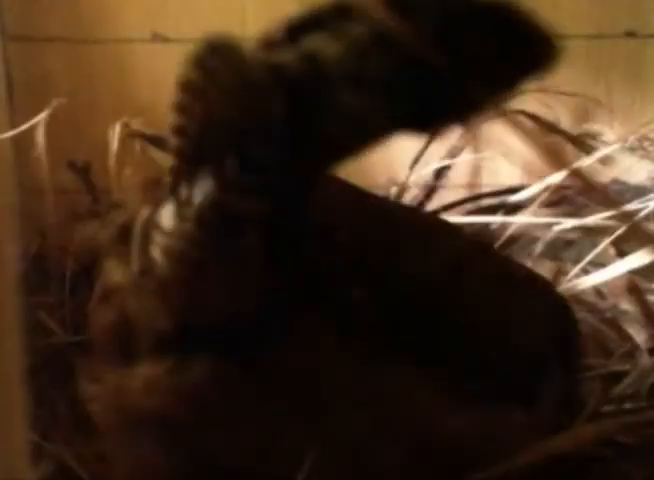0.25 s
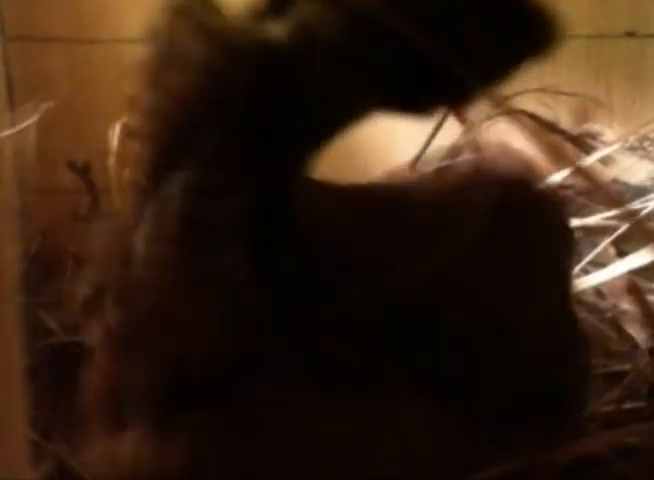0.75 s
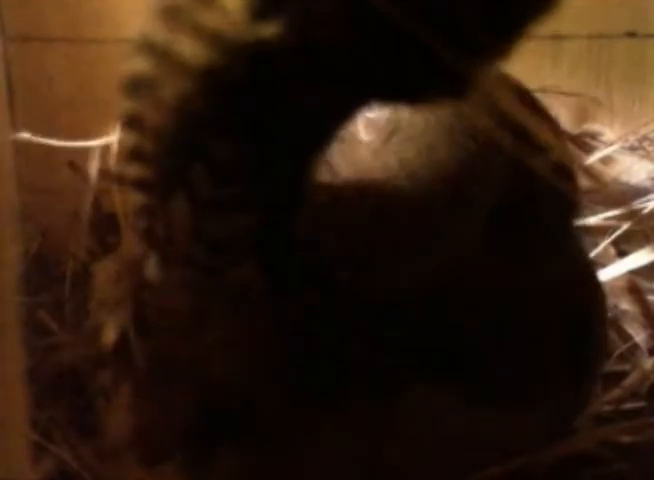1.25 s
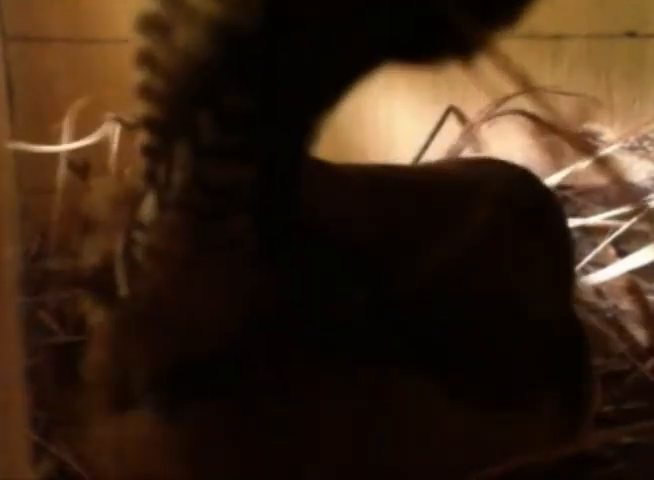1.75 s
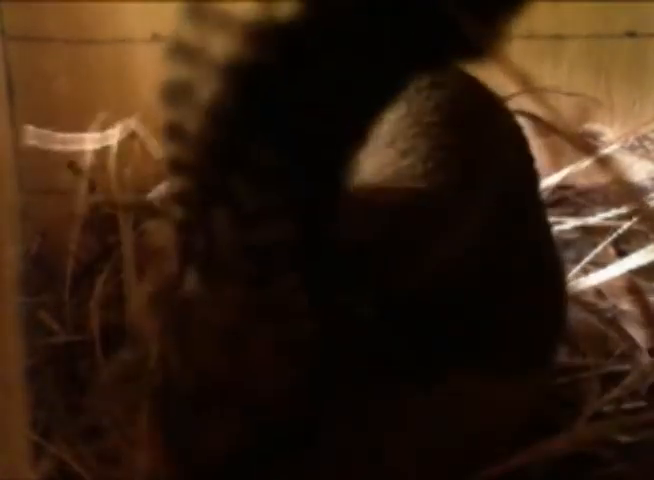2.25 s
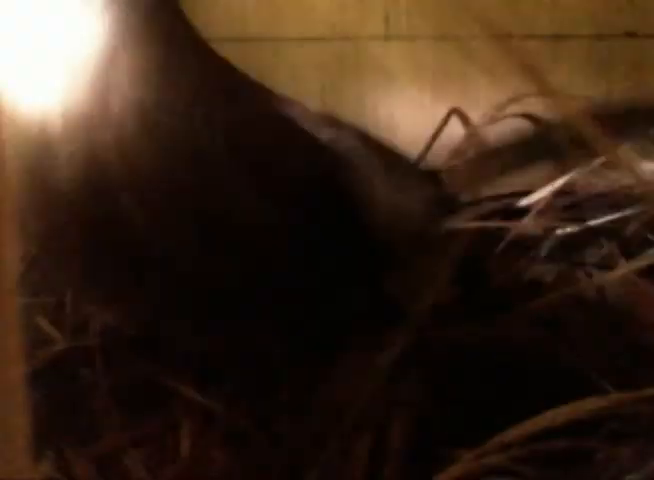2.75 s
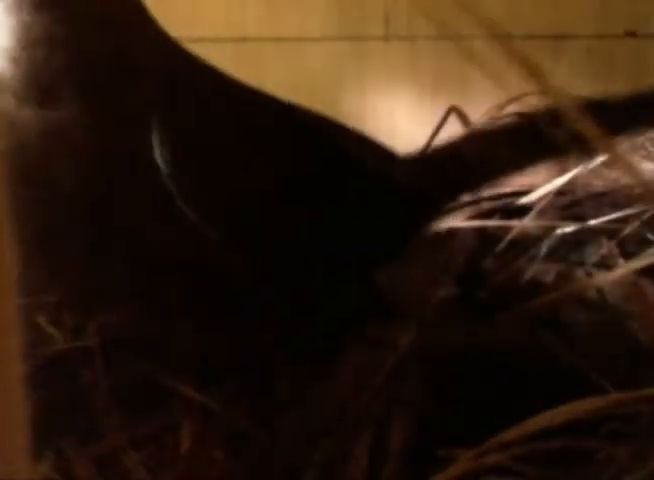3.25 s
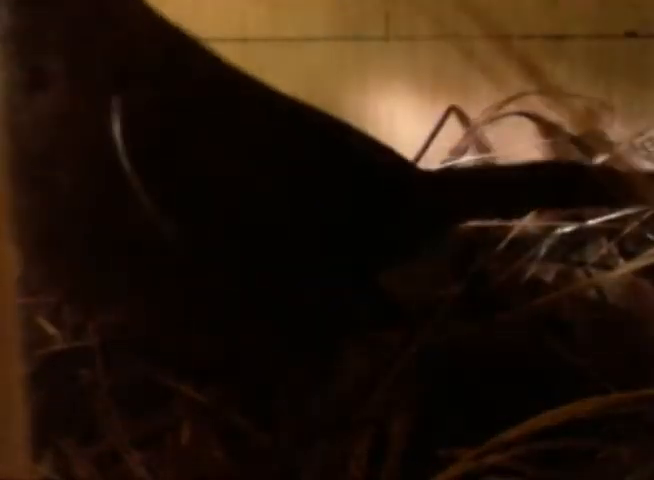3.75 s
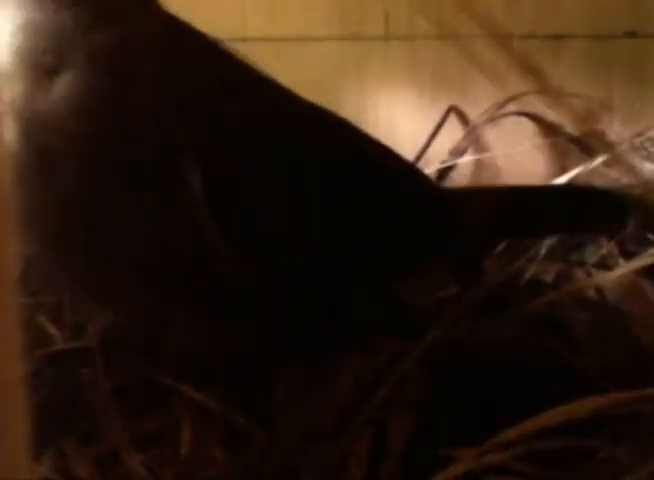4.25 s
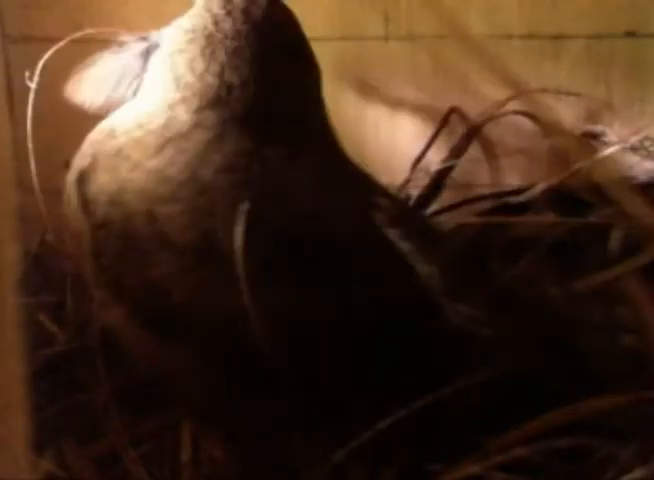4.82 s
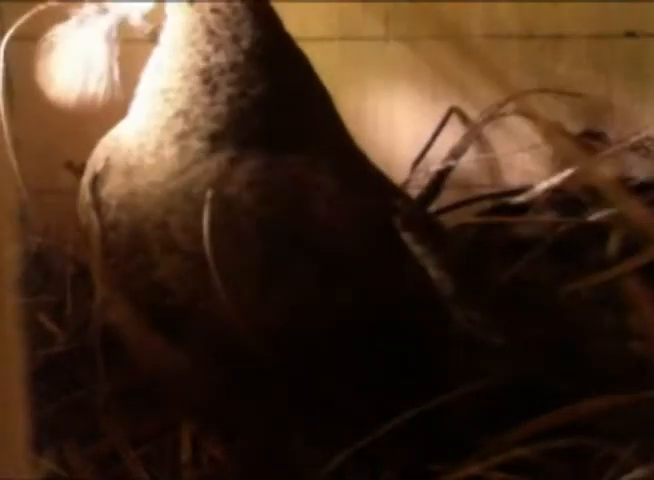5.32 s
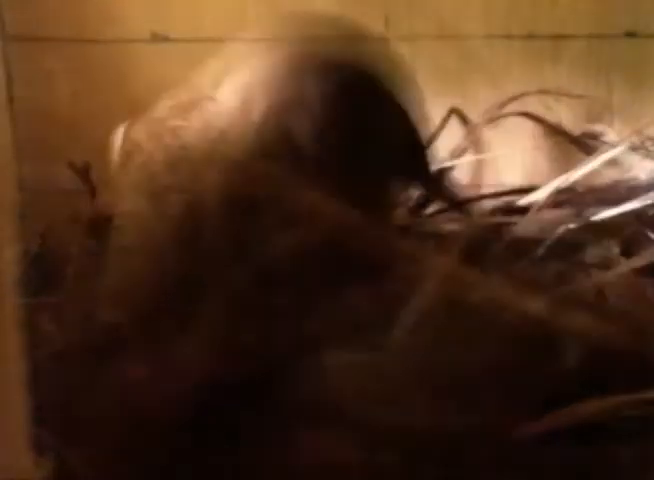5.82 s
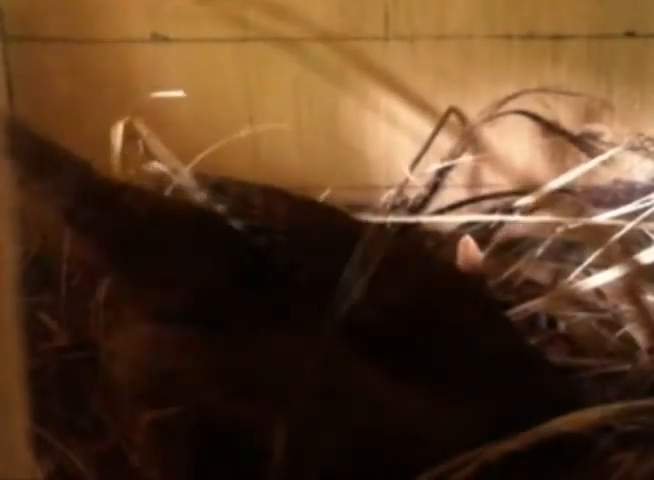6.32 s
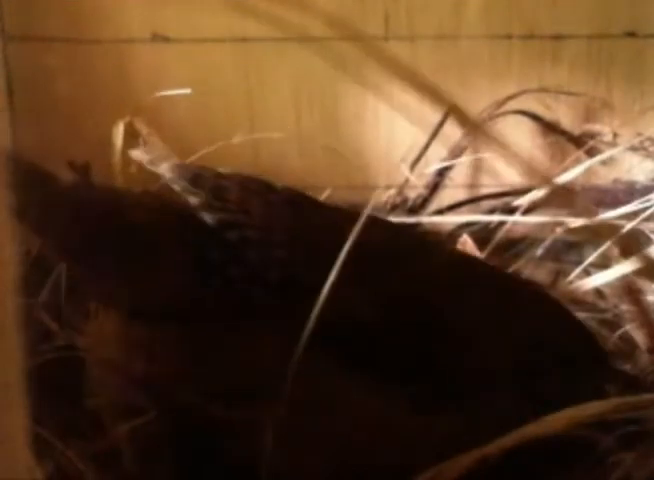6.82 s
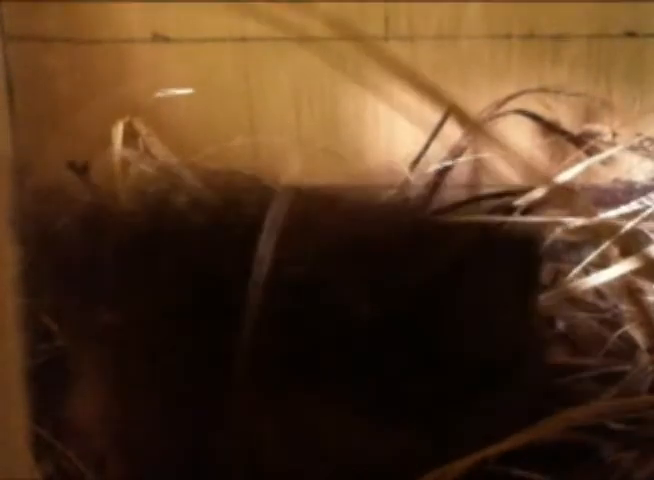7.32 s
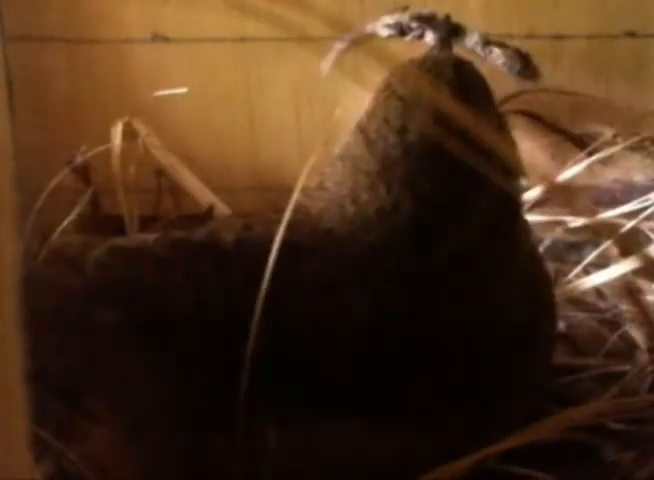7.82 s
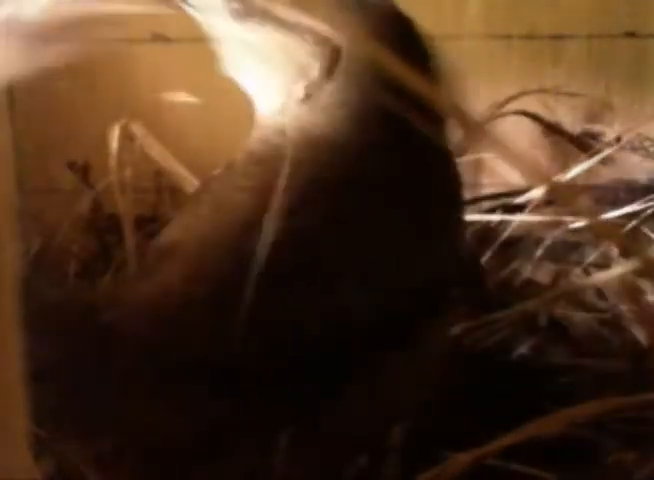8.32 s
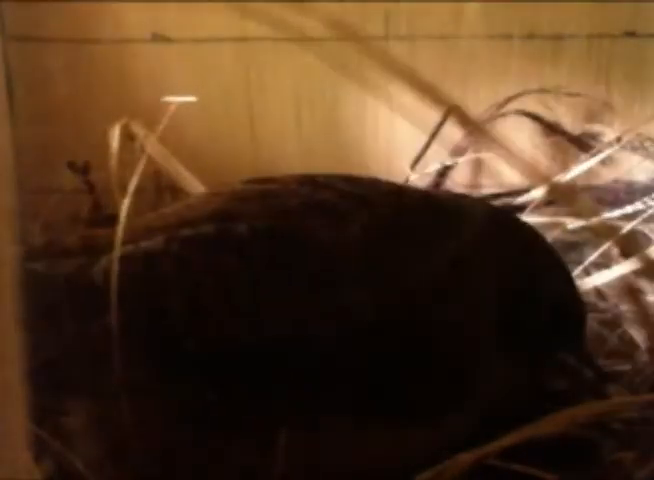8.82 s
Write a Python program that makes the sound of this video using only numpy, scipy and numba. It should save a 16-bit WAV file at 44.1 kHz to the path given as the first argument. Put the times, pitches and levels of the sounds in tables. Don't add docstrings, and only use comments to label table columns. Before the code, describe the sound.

Inside a wooden nest box, a bird shuffles in dry straw right beside the microphone, with crisp crackles and dull foot knocks mostly in the first second. Outside, a small bird bursts into a fast whistled phrase with a trill at about two seconds, and again after seven. Faint chips and distant birds fill the gaps, over constant hiss and low rumble.

```python
import sys
import numpy as np
from scipy import signal
from scipy.fft import rfft, irfft
from scipy.io import wavfile
from scipy.ndimage import uniform_filter1d
from numba import njit

SR = 44100
rng = np.random.default_rng(int(sys.argv[2]) if len(sys.argv) > 2 else 0)


def to_linear_factor(level_db):
    exponent = np.asarray(level_db, float) / 20
    return 10 ** exponent


def materialize(psi):
    bounded = np.clip(np.atleast_2d(psi).T, -1, 1)
    quanta = np.round(bounded * 32767).astype(np.int16)
    wavfile.write(sys.argv[1], SR, quanta)


N = 399987

# (pitch [Hz], width [Hz], level [dB])
BOX_MODES = [(289, 73, -3.5), (495, 121, -0.5), (834, 250, -11), (1262, 53, 8), (1710, 150, -5),
             (2295, 150, 0.5), (2730, 100, 1), (3230, 65, -0.5), (3860, 220, -3), (4550, 2900, -20),
             (6500, 530, -4), (10300, 1900, -16)]


@njit
def svf(x, hz, width_hz):
    y, b, l = np.empty(len(x)), 0., 0.
    g, k = np.tan(np.pi * hz / SR), width_hz / hz
    for i in range(len(x)):
        v = (b + g * (x[i] - l)) / (1 + g * (g + k))
        b, l, y[i] = 2 * v - b, l + 2 * g * v, k * v
    return y


def modes(x, table):
    return sum((-1) ** k * to_linear_factor(db) * svf(x, 1. * hz, 1. * w) for k, (hz, w, db) in enumerate(table))


def unit(x):
    return x / np.sqrt(np.mean(x ** 2))


def add(out, s, piece):
    i = int(s * SR)
    out[i:i + len(piece)] += piece[:N - i]


def walk(rate_hz):
    k = int(SR / rate_hz)
    steps = np.repeat(rng.standard_normal(N // k + 1), k)
    return unit(uniform_filter1d(uniform_filter1d(steps, k), k)[:N])


def sweep(hz):
    return 2 * np.pi * np.cumsum(hz) / SR


def preamp():
    # (frequency [Hz], density [dB per Hz])
    hiss_curve = [(15, -20), (33, -22), (158, -27), (400, -34.5), (1500, -43), (8000, -49), (12000, -47),
                  (15700, -43.5)]
    # (pitch [Hz], level [dB])
    whines = [(8640, -67), (13119, -79)]
    level_db = -47.5
    f = np.maximum(np.fft.rfftfreq(N, 1 / SR), 1)
    hz, db = np.transpose(hiss_curve)
    shape = to_linear_factor(np.interp(np.log(f), np.log(hz), db))
    band = np.sqrt(np.sum(shape[(f > 700) & (f < 15000)] ** 2) / np.sum(shape ** 2))
    out = unit(irfft(rfft(rng.standard_normal(N)) * shape, N)) * to_linear_factor(level_db) / band
    t = np.arange(N) / SR
    for hz, db in whines:
        out += to_linear_factor(db) * np.sqrt(2) * np.sin(2 * np.pi * hz * t)
    return out


def rumble():
    # (time [s], level [dB], extra on the lower mode [dB])
    course = [(0, -53.5, 1), (2.0, -52, -2), (3.3, -49.5, -1.5), (4.1, -47.5, -3), (4.7, -46, -4),
              (5.6, -50, -0.5), (6.3, -50, 3.5), (7.0, -53, 3.5), (7.7, -49.5, -1), (8.8, -49.5, -0.5),
              (9.07, -48, -2)]
    # (pitch [Hz], width [Hz], level [dB])
    low_modes = [(281, 40, 0), (479, 40, -4)]
    s, db, low_db = np.transpose(course)
    t, air = np.arange(N) / SR, rng.standard_normal(N)
    lower, upper = modes(air, low_modes[:1]), modes(air, low_modes[1:])
    hum = (lower * to_linear_factor(np.interp(t, s, low_db)) - upper) / np.std(lower - upper)
    return hum * to_linear_factor(np.interp(t, s, db) + 2 * walk(3.94))


def knocks():
    # (time [s], peak [dB], pitch [Hz])
    blows = [(0.022, -20.5, 259), (0.073, -24, 225), (0.146, -26.5, 267), (0.468, -23, 487),
             (0.55, -17.5, 482), (1.072, -25, 495), (3.999, -28.5, 380), (4.284, -32, 473),
             (5.903, -30, 500), (5.995, -37, 476), (6.076, -28, 273), (0.547, -25.5, 197),
             (0.611, -29, 490), (1.143, -35, 484), (5.912, -34, 200), (5.942, -28, 400), (0.351, -37, 313)]
    out, t = np.zeros(N), np.arange(2048) / SR
    for s, db, hz in blows:
        swell = (1 - np.exp(-t / 0.0009)) * np.exp(-t / 0.008)
        add(out, s - .002, to_linear_factor(db - 1.0) * np.sin(2 * np.pi * hz * t) * swell)
    return out


def close_up(x):
    return to_linear_factor(7.5) * svf(svf(x, 11700.0, 9300.0), 8900.0, 16000.0)


def shuffling():
    # (time [s], held [s], straw hiss [dB], wood rumble [dB])
    bouts = [(0.033, 0.12, -67, -45.5), (.35, 0.017, -54, -44), (0.55, 0.036, -51.5, -38.5),
             (.94, 0.028, -56, -45.5), (1.0599, 0.05, -49.5, -41.5), (3.99, .02, -52.5, -48),
             (5.92, 0.17, -51.5, -41), (.2, .2, -61, -50.5), (.16, 0.056, -60, -50),
             (0.471, 0.0077, -57, -51)]
    swell_db_per_s, fade_db_per_s = 224, 190
    straw, wood = np.zeros((2, N))
    for s, held_s, hiss_db, wood_db in bouts:
        t = np.arange(max(s - .12, 0), s + held_s + .1, 1 / SR)
        before_s, after_s = np.maximum(s - t, 0), np.maximum(t - s - held_s, 0)
        effort = to_linear_factor(-swell_db_per_s * before_s - fade_db_per_s * after_s)
        n = len(t)
        grains = to_linear_factor(3 * walk(90)[:n]) * (rng.random(n) < .3) * rng.standard_normal(n)
        add(straw, t[0], unit(grains) * to_linear_factor(hiss_db) * effort)
        add(wood, t[0], rng.standard_normal(n) * to_linear_factor(wood_db + 2.5 * walk(110)[:n]) * effort)
    scrape = to_linear_factor(10.5) * svf(straw, 3600.0, 7400.0)
    return close_up(straw) + scrape + to_linear_factor(21.0) * modes(wood, BOX_MODES[:2])


def straw_cracks():
    # (time [s], peak [dB], share heard through the box [dB], length [ms])
    snaps = [(0.072, -21, -7, 4.5), (0.083, -28.5, -7.5, 4.4), (0.091, -41, 8, 4), (0.111, -22, -15.5, 5.1),
             (0.122, -35, -11, 4.3), (0.1515, -24.5, -6, 2.3), (.158, -44, 5, 6.1), (0.18, -35, 1.5, 3.1),
             (0.233, -34.5, -5.5, 4.7), (0.318, -29.5, -3.5, 7.6), (0.328, -43, 8, 15), (0.343, -47, 0, 5),
             (0.364, -34.5, 2, 8.6), (0.381, -41, 4, 7.4), (0.463, -36, 6.5, 8.5), (0.476, -47, 5, 6),
             (.556, -38, -3, 5.7), (0.139, -45, 3, 8.8), (.337, -44.5, 7, 10), (0.531, -27.5, -8.5, 9.9),
             (.545, -27, -10.5, 9.4), (0.574, -30, -17, 3.9), (0.949, -35, -7, 4.2),
             (1.062, -28.5, -18, 6.4), (1.102, -36, -11, 11), (1.141, -36, -12, 4),
             (1.702, -34.5, -11, 3.8), (0.287, -51, 4, 9), (.197, -46, 2, 4.4), (0.395, -46, 3, 5),
             (2.034, -37, -19, 5.5), (3.282, -32, -17, 2.2), (3.7763, -35, -26, 3), (3.977, -40, -13, 14),
             (5.8948, -27.5, -12, 4.2), (5.939, -36, -8, 4), (5.995, -32, -8, 4.2), (6.003, -31, -19, 4.7),
             (6.04, -40, -13, 11), (6.118, -41, -19, 3), (6.062, -34, -16, 8.9)]
    colour_db = 2.5
    bright, boxed = np.zeros((2, N))
    t = np.arange(2048) / SR
    for s, db, box_db, ms in snaps:
        ragged = np.repeat(to_linear_factor(1.3 * rng.standard_normal(64)), 32) * 0.65
        swell = np.exp(-(t / (ms / 800)) ** 2) * np.clip(t / (0.88 * ms / 1e3), 0, 1)
        direct, inside = rng.standard_normal((2, 2048)) * ragged * swell
        add(bright, s - .001, to_linear_factor(db) * direct)
        chance = rng.standard_normal(len(BOX_MODES))
        coloured = [(hz, w, g + colour_db * c) for (hz, w, g), c in zip(BOX_MODES[1:], chance)]
        ring = modes(inside, coloured) + to_linear_factor(-14.5) * svf(inside, 2200.0, 3000.0)
        add(boxed, s - .001, to_linear_factor(db + box_db) * ring)
    return close_up(bright) + to_linear_factor(17.5) * boxed


def strokes():
    # (time [s], length [ms], start [Hz], end [Hz], level [dB])
    strays = [(0.503, 19, 2800, 2800, -49), (0.658, 11, 5900, 7240, -44), (.628, 45, 2790, 2800, -53.5),
              (1.933, 8, 2530, 2370, -44), (1.081, 17, 3730, 3540, -49), (1.166, 20, 4180, 4450, -47),
              (1.192, 20, 3880, 3500, -45), (1.2, 25, 4920, 4900, -51), (1.228, 12, 5700, 6000, -54),
              (1.291, 12, 2400, 2560, -47), (1.509, 32, 2580, 2360, -50), (1.792, 8.4, 3880, 3600, -44),
              (1.799, 9.8, 4200, 4960, -47), (1.812, 9, 6090, 6150, -44), (4.77, 56, 2770, 2820, -50),
              (6.463, 21, 4560, 4300, -50), (6.482, 28, 4000, 3520, -47.5), (6.548, 35, 4450, 4360, -52),
              (7.162, 11, 3720, 6120, -37.5), (7.164, 18, 3700, 3500, -48), (7.181, 25, 3540, 4450, -45.5),
              (7.174, 12, 6860, 7100, -49), (7.186, 13, 7100, 8400, -45), (7.744, 26, 5870, 5970, -41.5),
              (7.931, 25, 5800, 6000, -43), (8.311, 16, 6100, 5700, -44)]
    # (delay from its start [ms], length [ms], level [dB])
    flick = [(4.5, 11.6, -43.5), (-63, 33.4, -40), (14, 7.8, -34), (13, 5, -38), (55.5, 22.7, -34)]
    spike = [(32.6, 38, -47.5), (3, 5.5, -43), (13.8, 12, -32), (21.5, 5, -37), (40, 42, -42),
             (92.5, 3.5, -43), (97.6, 8, -40.5), (110, 11, -42)]
    peak = [(8, 47, -41), (0.91, 10.7, -30)]
    fall = [(1.544, 30, -25), (39.5, 10.2, -34.5), (0, 1.8, -38.5)]
    hook = [(-0.5, 11.8, -36.5), (9, 15.9, -32)]
    murmur = [(0, 17, -46), (36.1, 11, -38.5)]
    drop = [(-0.5, 7.9, -32.5), (7.5, 18, -33.5)]
    leap = [(0, 10, -39), (14.36, 20, -29.5), (21.84, 24, -39.5)]
    close = [(21, 15, -42), (0, 21, -36), (33.1, 13, -34.5), (43, 6.2, -40.5)]
    # (start [Hz], middle [Hz], end [Hz])
    flick_hz = [(5050, 5300, 5100), (3050, 2950, 2650), (5150, 4700, 3600), (6900, 6400, 5700),
                (2650, 3650, 3760)]
    spike_hz = [(2800, 2800, 2820), (4500, 4850, 5000), (6950, 6200, 6120), (5300, 4900, 4150),
                (5950, 5660, 5560), (4750, 4600, 4350), (4150, 4000, 3700), (3200, 2750, 2400)]
    peak_hz = [(6900, 7900, 7850), (6950, 6250, 6900)]
    fall_hz = [(4700, 3950, 3480), (4850, 4000, 3600), (4300, 4560, 4720)]
    hook_hz = [(2950, 3180, 3200), (3200, 2900, 2400)]
    murmur_hz = [(2010, 2050, 2040), (2530, 2420, 2390)]
    drop_hz = [(3300, 3620, 3720), (3780, 3150, 2400)]
    leap_hz = [(4150, 3800, 3680), (3900, 6050, 6650), (6400, 6560, 6510)]
    close_hz = [(2650, 3700, 5100), (3950, 3250, 2520), (5150, 4400, 4140), (4150, 4130, 4150)]
    # (time [s], effort [dB], pitch factor [ratio], extra on the first stroke [dB])
    flicks = [(1.919, -0.5, 1.005, 5), (7.291, -0.5, .995, 13.5)]
    spikes = [(2.032, 0.66, 1.005, -1.5), (7.401, -0.12, .995, -5)]
    peaks = [(2.188, -1.7, 1.007, -0.83), (7.557, 1, 1.01, -2.8)]
    falls = [(2.244, 2, 1.1, -4), (2.365, 4, 1, -8), (2.486, 3, 0.98, -6.5), (2.609, 2.5, 0.97, -5.5),
             (7.615, 1, 1.042, -5.5), (7.741, 0.5, 1, -2.5), (7.861, -1, 0.97, -2.5)]
    hooks = [(2.302, 1, 1.034, 6.5), (2.422, 0.84, 0.99, 3), (2.542, 0.17, 0.97, 1),
             (2.666, -0.35, 0.98, 0), (7.673, -0.61, 1.01, 5), (7.798, -0.3, 1.004, 5), (7.916, -2.2, 1, 3)]
    murmurs = [(2.745, -0.5, .995, 0.1), (2.871, 0.5, .99, -0.5), (7.995, 0.5, 1.005, -0.5),
               (8.121, 0.5, 1.002, -0.5), (8.247, 0.1, 1.008, 0.1)]
    drops = [(2.797, -0.5, 1, 2.5), (2.923, 3.5, 1.04, 1), (8.046, 0, 1.03, -3), (8.171, 1.5, 1.008, -3),
             (8.299, 0, 0.99, -2.5)]
    leaps = [(2.975, 2, 1.01, -1), (8.353, -1.4, .985, 1.2)]
    closes = [(3.281, 4, 1.008, -0.5), (8.653, -3, .99, -2)]
    rows = [(s, ms, start, (start + end) / 2, end, db) for s, ms, start, end, db in strays]
    for timing, glides, sung in [(flick, flick_hz, flicks), (spike, spike_hz, spikes), (peak, peak_hz, peaks),
                                 (fall, fall_hz, falls), (hook, hook_hz, hooks), (murmur, murmur_hz, murmurs),
                                 (drop, drop_hz, drops), (leap, leap_hz, leaps), (close, close_hz, closes)]:
        for s, effort_db, factor, first_db in sung:
            for k, ((late_ms, ms, db), hz) in enumerate(zip(timing, glides)):
                level_db = db + effort_db + first_db * (k == 0)
                rows.append((s + late_ms / 1e3, ms, *np.multiply(factor, hz), level_db))
    return rows


def whistles():
    out = np.zeros(N)
    lead_s, flutter_db = 0.0034, 2.1
    for s, ms, start, middle, end, db in strokes():
        length_s = ms / 1e3
        u = np.linspace(-lead_s, length_s + lead_s, int((length_s + 2 * lead_s) * SR)) / length_s
        v = np.clip(u, 0, 1)
        hz = start * (2 * v - 1) * (v - 1) + middle * 4 * v * (1 - v) + end * v * (2 * v - 1)
        add(out, s - lead_s, to_linear_factor(db) * signal.windows.tukey(len(u), .84) * np.sin(sweep(hz)))
    return out * to_linear_factor(flutter_db * walk(220))


def garden(x):
    # (delay [ms], level [dB])
    bounces = [(2.3, -10), (4.4, -11), (9.5, -19), (31, -17)]
    # (pitch [Hz], width [Hz], level [dB])
    long_ring = (4140, 14, -5)
    t60_s, tail_db = 0.58, -8
    t = np.arange(int(.5 * SR)) / SR
    near = 1 + 0.8 * np.clip((.075 - t) / 0.02, 0, 1)
    tail = rng.standard_normal(len(t)) * near * to_linear_factor(-60 * t / t60_s) * np.clip(t / 0.017, 0, 1)
    tail *= to_linear_factor(1.5 * walk(200)[:len(t)])
    tail *= to_linear_factor(tail_db) / np.sqrt(np.sum(tail ** 2))
    for k, (ms, db) in enumerate(bounces):
        tail[int(ms / 1e3 * SR)] += (-1) ** k * to_linear_factor(db)
    y = signal.fftconvolve(x, tail)[:N]
    hz, width_hz, db = long_ring
    return y + to_linear_factor(db) * svf(y + x, 1. * hz, 1. * width_hz)


def box(x):
    # (pitch [Hz], width [Hz], level [dB])
    air_modes = [(2240, 70, -24), (2450, 300, 2.5), (2800, 100, 4.5), (3155, 53, 5.5), (3770, 500, 5.5),
                 (4200, 38, 3.5), (4760, 870, 0), (6150, 570, -3), (6750, 210, 3), (8400, 2700, -10)]
    return to_linear_factor(-11) * x + sum(to_linear_factor(db) * svf(x, 1. * hz, 1. * w) for hz, w, db in air_modes)


def cancel(y):
    # (pitch [Hz], width [Hz], depth [0-1])
    nulls = [(2584, 84, 0.9), (3000, 190, 0.77), (3464, 110, 0.4), (3960, 150, 0.95), (4300, 190, 0.3),
             (5273, 160, 1), (5700, 88, 0), (6175, 100, 0.26), (6380, 92, 0.9), (7000, 150, 0.8)]
    for hz, width_hz, depth in nulls:
        y = y - depth * svf(y, 1. * hz, 1. * width_hz)
    return y


def slurs():
    # (time [s], length [ms], start [Hz], end [Hz], level [dB])
    far_glides = [(.665, 170, 7000, 5870, -59), (.95, 96, 4900, 6700, -53), (1.03, 96, 6800, 6200, -51),
                  (1.05, 44, 6400, 5900, -56), (1.195, 71, 4770, 6540, -49), (1.249, 130, 6700, 6750, -53),
                  (1.3, 100, 6500, 5840, -54), (1.485, 65, 6050, 6800, -54), (1.55, 120, 6850, 6340, -58),
                  (1.585, 43, 6100, 6000, -55), (3.93, 30, 4500, 4400, -47), (3.949, 45, 4300, 3990, -56),
                  (4.011, 57, 4420, 3950, -53), (4.5, 92, 4700, 4900, -65), (4.625, 41, 4460, 4460, -58),
                  (4.635, 53, 4000, 3900, -66), (6.18, 36, 5940, 5700, -57), (6.4, 34, 6200, 5700, -53),
                  (6.43, 45, 4900, 4900, -56), (6.46, 66, 2720, 2590, -59), (6.49, 40, 4950, 4950, -56),
                  (6.59, 46, 4410, 3960, -56), (6.66, 30, 4300, 4160, -55), (6.835, 53, 2400, 2220, -57),
                  (6.82, 41, 3300, 2880, -60), (1.36, 40, 4300, 3000, -62), (4.06, 55, 4230, 3900, -62),
                  (6.97, 90, 6160, 6150, -57), (7.17, 25, 6100, 5900, -44), (7.175, 27, 5400, 5400, -46)]
    blur_hz = 380
    out, waver = np.zeros(N), walk(2 * blur_hz) + 1j * walk(2 * blur_hz)
    for s, ms, start, end, db in far_glides:
        n, i = int(ms / 1e3 * SR), int(s * SR)
        glide = np.exp(1j * sweep(np.linspace(start, end, n)))
        add(out, s, to_linear_factor(db) * signal.windows.tukey(n, .5) * np.real(waver[i:i + n] * glide))
    return out


def far_birds():
    # (time [s], length [ms], pitch [Hz], spread [Hz], level [dB]); the row at 5.93 s is a band of the
    calls = [(2.451, 230, 1235, 70, -47.5), (4.185, 200, 1240, 60, -51), (4.32, 200, 1230, 60, -51),
             (7.139, 290, 1230, 70, -46.5), (4.44, 95, 6600, 250, -58), (4.79, 70, 6600, 300, -59),
             (4.62, 75, 4250, 600, -57), (1.28, 330, 2900, 1600, -58), (6.56, 130, 2900, 1400, -58),
             (4.29, 110, 6540, 300, -61), (3.9, 110, 6600, 300, -58), (4.4, 60, 6600, 500, -60),
             (5.93, 150, 4230, 900, -53), (4.63, 80, 6550, 400, -57), (6.135, 73, 6400, 130, -46.5),
             (6.35, 110, 6480, 140, -48), (6.3, 250, 5700, 1800, -57), (8.04, 110, 6650, 410, -54),
             (8.15, 140, 6670, 330, -55.5), (8.27, 150, 6570, 320, -54)]
    throb_db = -2.0
    out = np.zeros(N)
    for s, ms, hz, spread_hz, db in calls:
        n = int(ms / 1e3 * SR)
        band = svf(rng.standard_normal(SR // 2), 1. * hz, 1. * spread_hz)
        band = svf(band, 1. * hz, 1. * spread_hz)[-n:]
        add(out, s, to_linear_factor(db) * signal.windows.tukey(n, .5) * unit(band))
    return out * to_linear_factor(throb_db * walk(60))


def chips():
    # (time [s], length [ms], level [dB])
    buzzes = [(1.469, 63, -46), (1.656, 6, -41.5), (1.699, 11.5, -44), (1.747, 10, -42), (6.505, 11, -52),
              (6.572, 10, -48), (6.598, 14, -54), (6.68, 16, -48), (6.788, 54.6, -46.5), (6.975, 10.6, -46),
              (7.022, 10, -43.5), (7.07, 8.1, -44), (7.117, 15, -46)]
    pulses = np.zeros(N)
    for s, ms, db in buzzes:
        u = np.linspace(0, 1, int(ms / 1e3 * SR))
        hz = (520 if ms < 20 else 620) * (1 + .16 * (np.sin(np.pi * u) - 1))
        phase = sweep(hz)
        add(pulses, s, to_linear_factor(db) * np.hanning(len(u)) * sum(np.cos(k * phase) for k in range(4, 9)))
    return svf(svf(pulses, 2900.0, 1600.0), 2900.0, 1600.0)


def trill():
    # (time [s], level [dB], lift of the top [dB], pitch factor [ratio])
    syllables = [(3.039, -30, -0.5, 1), (3.098, -29.5, -2, 1.04), (3.158, -29, -2, 1.06),
                 (3.2193, -29.5, -2, 1.04), (8.414, -31, -9.5, 1.01), (8.474, -35, -3.5, .98),
                 (8.532, -34.5, -1, 1.03), (8.593, -34.5, 0.5, 1)]
    corner_ms = [-8, -4, 0, 4, 8, 13, 17, 21, 28]
    corner_hz = [4700, 5400, 4800, 3700, 4200, 5950, 6800, 7120, 7180]
    corner_db = [-16, -16, 3.5, -12, -10, 2, 11, -3, -5]
    out = np.zeros(N)
    t_ms = np.arange(corner_ms[0], corner_ms[-1], 1e3 / SR)
    pitch = uniform_filter1d(np.interp(t_ms, corner_ms, corner_hz), size=40)
    effort_db = np.interp(t_ms, corner_ms, corner_db)
    for s, db, top_db, factor in syllables:
        swell = to_linear_factor(db + effort_db + top_db * np.clip((pitch - 5000) / 1200, 0, 1))
        tone = np.sin(sweep(pitch + (factor - 1) * 4400))
        add(out, s + corner_ms[0] / 1e3, swell * signal.windows.tukey(len(t_ms), .1) * tone)
    return out


def scene():
    nest = rumble() + knocks() + shuffling() + straw_cracks()
    song, far = whistles() + chips() + trill(), slurs()
    echoes = garden(song + far)
    outdoors = box(song + .5 * echoes + far_birds() + to_linear_factor(-6) * far) + echoes
    return (cancel(outdoors) + nest)[None]


def roll_off(x):
    return signal.sosfilt(signal.butter(12, 17100, fs=SR, output="sos"), x)


def record(dry):
    low_pass = signal.ellip(8, .1, 40, 15730, fs=SR, output="sos")
    mix = signal.sosfiltfilt(low_pass, dry + preamp()) - .0972
    return roll_off(mix)


dry = scene()
out = record(dry)
materialize(out)
```